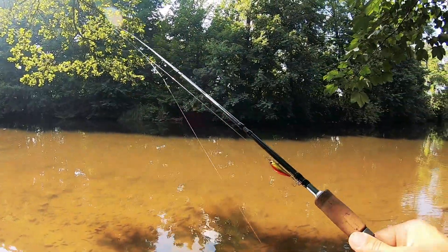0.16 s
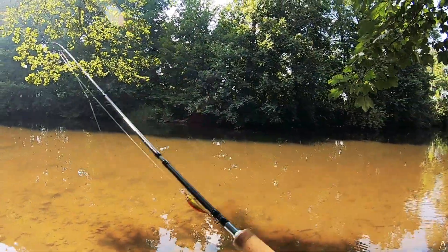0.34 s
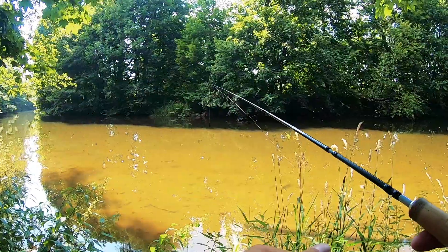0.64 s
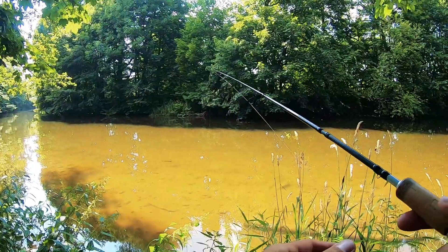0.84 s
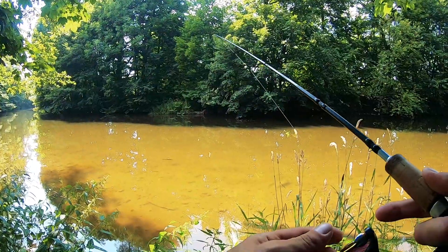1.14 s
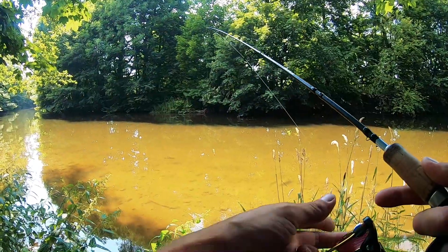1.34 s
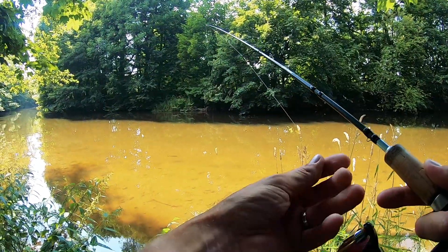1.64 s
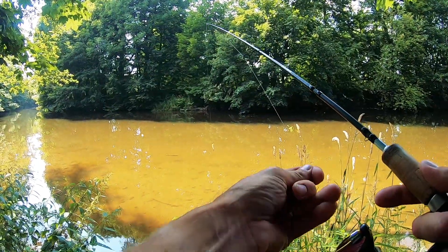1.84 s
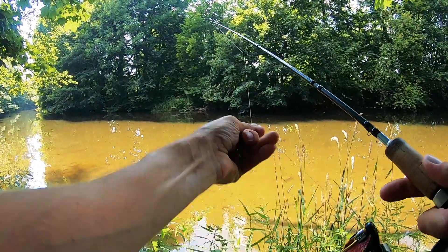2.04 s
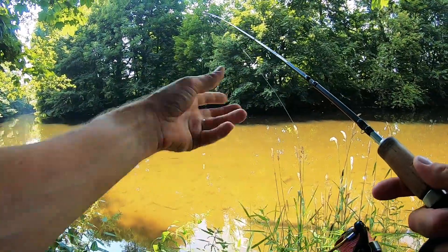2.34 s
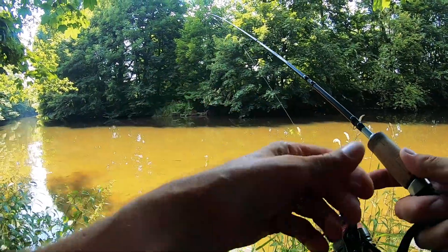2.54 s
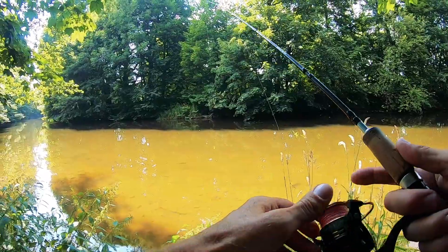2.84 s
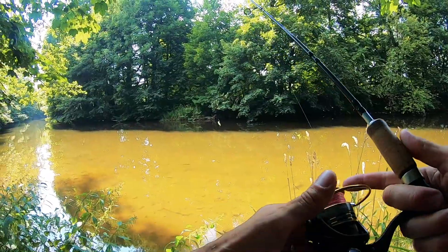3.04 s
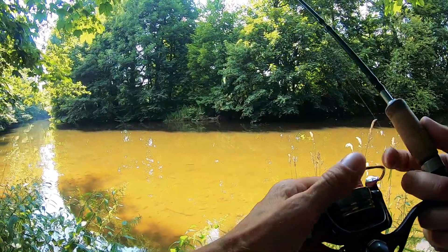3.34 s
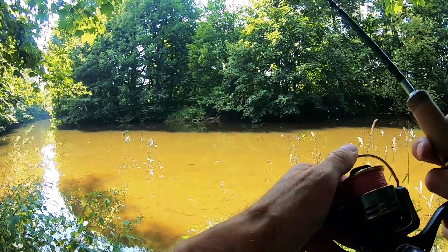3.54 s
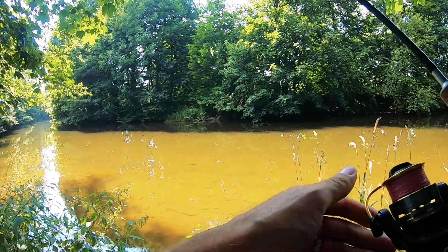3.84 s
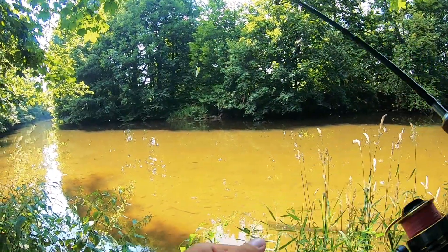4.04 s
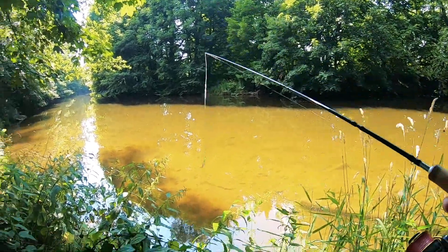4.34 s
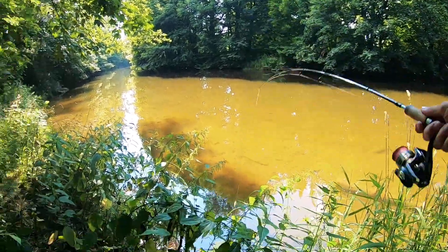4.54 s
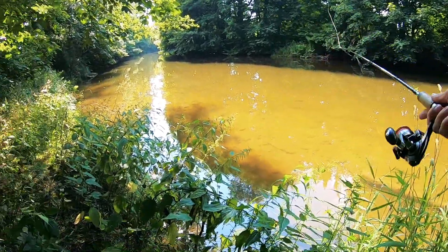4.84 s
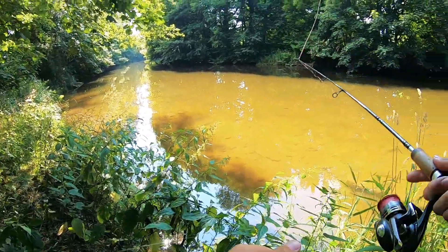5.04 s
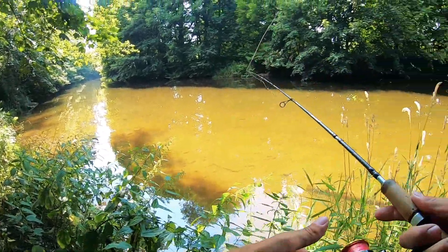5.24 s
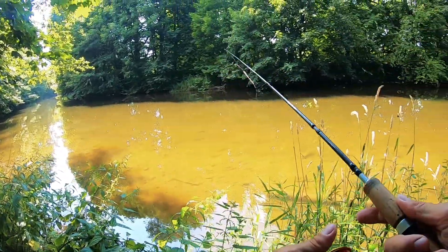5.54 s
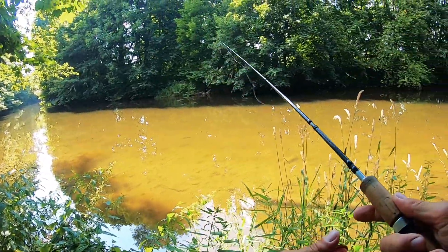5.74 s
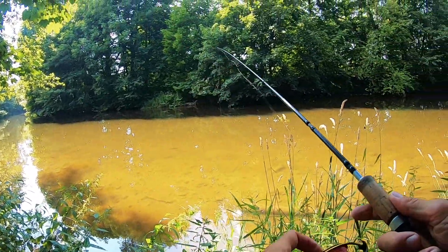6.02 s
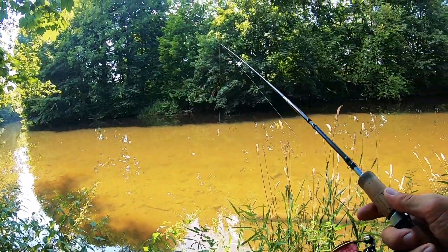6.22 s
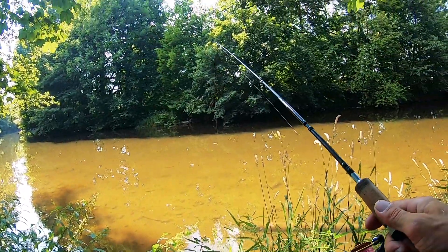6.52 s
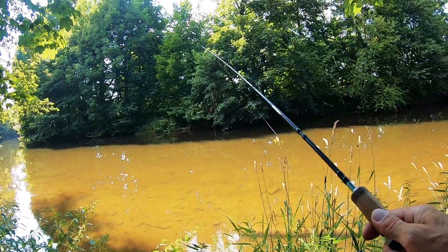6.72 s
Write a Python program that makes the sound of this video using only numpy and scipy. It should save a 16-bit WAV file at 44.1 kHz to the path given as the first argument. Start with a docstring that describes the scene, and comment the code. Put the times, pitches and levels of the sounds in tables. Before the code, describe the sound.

On a wooded riverbank with chirping birds, a reel's drag buzzes briefly, a rod casts with a knock, line hisses, and the reel snaps shut.

```python
"""A wooded river bank, where an angler casts: line is pulled off against the reel's clicking drag,
the bail is opened, the rod swings past, line hisses out and the bail snaps shut.
Drag and spool are clicks and rings; reel and rod are struck resonances; the swing's puff of air is a pressure dip.
Sleeve and line are rubbing noise. Small birds, as gliding whistles with echoes from the trees, call over
a soft rush, light air and a brief low drone of coloured noise."""
import sys
import numpy as np
from scipy import signal
from scipy.fft import rfft, irfft
from scipy.io import wavfile

SR = 44100
rng = np.random.default_rng(int(sys.argv[2]) if len(sys.argv) > 2 else 0)


def generate_wav(sig):
    """Save sig (samples, or channels by samples) to the path in sys.argv[1] as 16-bit PCM at SR."""
    pcm = np.round(np.clip(np.atleast_2d(sig).T, -1, 1) * 32767).astype(np.int16)
    wavfile.write(sys.argv[1], SR, pcm)


N = 303408
TIME = np.arange(N) / SR
RUSH_ONSET_S = .425   # the rush sets in loud here, after a hushed start
GRIP_S = 2.1   # from here on the hands keep rustling on rod and reel

# kinds of bird call, each one glide: length_s, first_hz, last_hz (both before the call's pitch ratio),
# bend (1 straight, more = quick at first), loudest (share of the length)
RISING = (.15, 2620, 3920, .9, .58)
FALLING = (0.15, 5350, 4600, 2.5, 0.31)
HELD = (.13, 5250, 4950, 1.6, .3)
THIN = (.08, 7600, 7150, 1.0, .35)
SLUR = (.09, 6300, 3200, 1, 0.48)


def from_db(db):
    """Decibels to gain."""
    return 10 ** (np.asarray(db) / 20)


def rms_one(x):
    """Scale to unit power."""
    return x / np.sqrt(np.mean(x ** 2) + 1e-20)


def add(out, s, sound):
    """Mix a sound in at time s."""
    at = max(int(s * SR), 0)
    out[:, at:at + sound.shape[-1]] += sound[..., :max(N - at, 0)]


def pan(left_db):
    """Gains of the two channels for a level difference, left minus right."""
    return from_db(np.array([[left_db], [-left_db]]) / 2)


def bump(s, width_s):
    """A bell-shaped rise and fall around time s."""
    return np.exp(-((TIME - s) / width_s) ** 2)


def swell(start_s, rise_s, hold_s, fade_db_per_s):
    """An envelope that rises to 1, holds and dies away."""
    t = TIME - start_s
    return np.clip(t / rise_s, 0, 1) * from_db(-fade_db_per_s * np.maximum(t - rise_s - hold_s, 0))


def drift(rate, t=TIME):
    """Random wander with a spread near 1: this many random points per second, joined by straight lines."""
    return np.interp(t * rate, np.arange(4000), rng.standard_normal(4000))


def port_noise(size, alike, lag_count=0):
    """White noise at two microphone ports: partly shared, reaching the left one some samples late."""
    shared, own = rng.standard_normal(size), rng.standard_normal((2, size))
    return np.sqrt(alike) * np.array([np.roll(shared, lag_count), shared]) + np.sqrt(1 - alike) * own


def coloured(white, colour):
    """Noise given a spectrum; rms 1."""
    hz, db = np.transpose(colour)
    log_hz = np.log(np.arange(N // 2 + 1) * SR / N + 1e-3)
    gain = from_db(np.interp(log_hz, np.log(hz), db, left=-90))
    return rms_one(irfft(rfft(white) * gain, N))


def resonate(x, modes):
    """Parallel resonances of unit peak gain before their levels, signs alternating."""
    out = 0
    for k, (hz, width_hz, db) in enumerate(modes):
        r = np.exp(-np.pi * width_hz / SR)
        zeros = np.array([1, 0, -1]) * (1 - r * r) / 2
        poles = [1, -2 * r * np.cos(2 * np.pi * hz / SR), r * r]
        out = out + (-1) ** k * from_db(db) * signal.lfilter(zeros, poles, x + 1e-18)
    return out


def scatter(x, t60, alike):
    """Diffuse echoes from ground, trunks and leaves, at unit energy."""
    t = TIME[:SR]
    tail = port_noise(SR, alike) * np.exp(-np.log(1000) * t / t60) * (1 - np.exp(-t / 0.0016))
    tail = tail / np.sqrt(np.sum(tail ** 2) / 2)
    return signal.fftconvolve(np.atleast_2d(x), tail, axes=1)[:, :N]


def burst(t, decay_s, alike):
    """A dying scrape of two hard parts, its energy spread evenly over all pitches."""
    spectrum = rfft(port_noise(len(t), alike, lag_count=3) * np.exp(-t / decay_s))
    even = irfft(spectrum / (np.abs(spectrum) + 1e-12), len(t))
    even = even * np.exp(-(t / decay_s / 4) ** 2)
    return even * np.sqrt(decay_s * SR / 2 / np.sum(even ** 2, axis=1, keepdims=True))


def rubbing(gain, colour, grain_db, left_db):
    """Sliding friction: a hiss made uneven by fibres that catch and slip."""
    hiss = coloured(port_noise(N, alike=0.054, lag_count=3), colour)
    return gain * hiss * from_db(grain_db * drift(300)) * pan(left_db)


def strikes(hits, body, rattle_s, rattle_db, rattle_db_per_doubling, knock_hz, tick_hz, alike, echo_db):
    """Blows on one body: heavy ones wake its low modes, light ones its high modes; a duller rattle goes along."""
    usual_contact_s = 0.0021   # a blow this long leaves rattle_db; longer scrapes leave more
    out, t = np.zeros((2, N)), TIME[:8192]
    dull = signal.butter(4, 10000, fs=SR, output="sos")
    for s, knock_db, tick_db, decay_s, left_db in hits:
        shaken_db = rattle_db + rattle_db_per_doubling * np.log2(decay_s / usual_contact_s)
        rattle = signal.sosfilt(dull, port_noise(len(t), alike=0.49)) * np.exp(-t / rattle_s)
        rattle = rattle * from_db(shaken_db + 2.9 * drift(217, t))
        modes = []
        for hz, width_hz, db, lean_db in body:
            # between knock and tick pitch the blow's level is a straight line over log pitch
            blow_db = np.interp(np.log(hz), np.log([knock_hz, tick_hz]), [knock_db, tick_db])
            # each mode radiates to the two ports in its own way
            sides_db = (left_db + lean_db) * np.array([[1], [-1]]) / 2
            modes.append((hz, width_hz, db + blow_db + sides_db))
        add(out, s, resonate(burst(t, decay_s, alike) + rattle, modes))
    return out + from_db(echo_db) * signal.sosfilt(dull, scatter(out, t60=0.59, alike=.2))


def outdoors(hush_db=-15, apart_hz=7000, waver_db=.5):
    """A far rush of water and leaves: hushed at first, then loud, settling and widening, with a dip after the cast."""
    # colour of the rush: pitch_hz, level_db
    rush_colour = [(53, -59), (90, -9), (108, -20), (141, -4.5), (159, 1), (280, -8), (396, -3.5),
                   (685, -4.5), (856, -2), (1050, -5), (2180, -26), (4900, -35), (5650, -41.5), (7360, -35),
                   (11500, -58), (15000, -88), (22000, -120)]
    # colour of the part that differs between the ports: pitch_hz, level_db
    spread_colour = [(59, -54), (100, -26), (136, -3), (162, 2.5), (298, -21), (754, -4), (1190, -5),
                     (1290, -6.5), (2500, -30.5), (3250, -59), (5500, -120)]
    rush_db, extra_db, settle_s = -52.5, 7, 2.02
    dip_s, dip_db, recover_s = 4.42, -5, 2.15
    spread_db, spread_start_s, spread_rise_s = -57, 0.79, 1.3
    settling_db = extra_db * np.clip(1 - (TIME - RUSH_ONSET_S) / settle_s, 0, 1)
    dipping_db = dip_db * (TIME > dip_s) * np.exp(-np.abs(TIME - dip_s) / recover_s)
    level_db = rush_db + settling_db + dipping_db + hush_db * (TIME < RUSH_ONSET_S)
    # long waves reach both ports alike, short ones differ
    high_pass = signal.butter(1, apart_hz, "high", fs=SR, output="sos")
    apart = signal.sosfilt(high_pass, rng.standard_normal(N))
    rush = coloured(rng.standard_normal(N) + apart * [[1], [-1]], rush_colour)
    rush = rush * from_db(level_db + waver_db * drift(7.5))
    widening = from_db(spread_db) * np.clip((TIME - spread_start_s) / spread_rise_s, 0, 1)
    spread = widening * coloured(rng.standard_normal(N), spread_colour)
    return rush + spread * [[1], [-1]]


def breeze(hush_db=-8, lumpy_db=4):
    """Light air buffets the ports as low, lumpy noise, with a few gusts."""
    # colour of the buffeting: pitch_hz, level_db
    buffet_colour = [(15, -11), (35, 10), (55, 11), (85, -4), (110, -16), (150, -45)]
    # gusts: centre_s, level_db
    gust_rows = [(.47, -56), (1.93, -60), (2.2, -61), (3.08, -61), (3.74, -56), (4.39, -42), (5.65, -56)]
    steady_db, gust_half_width_s = -66.5, .06
    steady = from_db(steady_db + hush_db * (TIME < RUSH_ONSET_S))
    gusts = sum(from_db(db) * bump(s, gust_half_width_s) for s, db in gust_rows)
    buffeting = coloured(port_noise(N, alike=0.58), buffet_colour)
    return buffeting * np.hypot(steady, gusts) * from_db(lumpy_db * drift(5.5))


def far_drone():
    """A far low drone, the same at both ports: narrow noise that comes in with the rush and fades away."""
    # colour of the drone: pitch_hz, level_db
    drone_colour = [(90, -34), (130, -5), (170, 13), (230, 0), (400, -42), (2000, -79.5)]
    envelope = swell(RUSH_ONSET_S, rise_s=0.082, hold_s=0.36, fade_db_per_s=27)
    return from_db(-54) * envelope * coloured(port_noise(N, alike=1.0), drone_colour)


def birds(waver=0.012, flutter_db=4.0, wood_db=-3.0, taper=1.6):
    """Wavering whistles that swell and fade along a glide, smeared by the trees; the farthest arrive mostly as echo."""
    # calls: start_s, kind, level_db, pitch ratio, direct_db (direct sound's gain beside the echoes)
    bird_calls = [(.425, HELD, -56.5, 0.98, -17), (.69, RISING, -60, .98, -28),
                  (1.165, THIN, -70, .995, -2), (1.32, THIN, -66, 0.93, -15),
                  (1.476, RISING, -52, 0.98, -4.5), (1.68, THIN, -69, 1.03, -7),
                  (3.014, RISING, -53.5, 1.02, 1), (3.24, THIN, -63.5, 0.98, -10),
                  (3.255, SLUR, -64, 0.97, -2), (3.39, THIN, -62.5, 1.02, -10),
                  (3.845, FALLING, -57.5, .99, -1.5), (4.98, FALLING, -59.5, 1.01, -1.5),
                  (5.665, RISING, -54, 0.99, -5), (5.881, THIN, -59, 0.95, -21),
                  (6.015, HELD, -57.5, .94, -8)]
    glide_share = .76   # the glide takes this share of a call; then the pitch is held
    calls, direct = np.zeros((2, 2, N))
    for s, (length_s, first_hz, last_hz, bend, loudest), db, ratio, direct_db in bird_calls:
        t = TIME[:int(length_s * SR)]
        to_go = np.maximum(1 - t / (glide_share * length_s), 0)
        hz = last_hz + (first_hz - last_hz) * to_go ** bend
        arch = np.sin(np.interp(t / length_s, [0, loudest, 1], [0, np.pi / 2, 0])) ** taper
        phase = 2 * np.pi * np.cumsum(hz * ratio * (1 + waver * drift(501, t))) / SR
        call = np.sqrt(2) * arch * from_db(db + flutter_db * drift(121, t)) * np.sin(phase)
        add(calls, s, call)
        add(direct, s, from_db(direct_db) * call)
    return direct + from_db(wood_db) * scatter(calls, t60=0.64, alike=0.7)


def sleeve_rub():
    """Cloth friction: single arm movements rub the sleeve over the steady rustle of the grip."""
    # arm movements: start_s, rise_s, hold_s, level_db
    arm_moves = [(-.02, 0.034, 0.069, -53.5), (0.215, 0.074, 0.041, -55.5), (0.373, 0.027, 0.016, -54.5),
                 (1.79, 0.27, 0.2, -53.5), (2.987, 0.027, 0.018, -61), (3.87, 0.19, 0.45, -51.5),
                 (4.671, 0.047, .05, -57), (6.08, 0.064, 0.047, -50), (6.735, 0.026, 0.018, -62.5)]
    # colour of the rubbing: pitch_hz, level_db
    cloth_colour = [(200, 10), (600, 4), (1400, 3.5), (2500, -4), (4000, -5.5), (6000, -7), (8500, -10),
                    (11000, -27), (15000, -79)]
    fade_db_per_s, grip_db = 90, -62
    moves = [from_db(db) * swell(s, rise_s, hold_s, fade_db_per_s) for s, rise_s, hold_s, db in arm_moves]
    grip = from_db(grip_db) * (TIME > GRIP_S)
    strength = np.sqrt(np.sum(np.square(moves), axis=0) + grip ** 2)
    return rubbing(strength, cloth_colour, grain_db=2.0, left_db=-2.0)


def line_hiss():
    """Line rubs as it runs out through the rod rings, then slows with the lure."""
    # colour of the hiss: pitch_hz, level_db
    hiss_colour = [(2000, -47), (5000, -3.5), (8500, 2.5), (10300, -10), (12000, -23), (15000, -28)]
    running = from_db(-60.5) * swell(4.836, rise_s=0.12, hold_s=0.16, fade_db_per_s=51)
    return rubbing(running, hiss_colour, grain_db=3.5, left_db=-3.5)


def air_puff(port_hz=22, port_q=0.78):
    """The swing drags air past the ports: brief suction, which rebounds in the microphone's bass cut."""
    # puffs of air: centre_s, suction_db, half_width_s
    puff_rows = [(4.3690, -4, .008), (4.370, -9, .002), (4.400, -13, .007)]
    suction = -sum(from_db(db) * bump(s, width_s) for s, db, width_s in puff_rows)
    w = 2 * np.pi * port_hz
    bass_cut = signal.bilinear([1, 0, 0], [1, w / port_q, w * w], SR)
    return signal.lfilter(*bass_cut, suction) * pan(-9.7)


def rod_strikes():
    """Line and tackle strike the rod during the cast and wake the modes of its blank and rings."""
    # blows: start_s, knock_db (low), tick_db (high), decay_s, left_minus_right_db
    rod_hits = [(4.3238, -21, -28, 0.002, -2), (4.3977, -7, -16, 0.00043, -12.5),
                (4.658, -34, -59, 0.0032, 4), (4.7175, -30, -31, 0.00086, -10),
                (4.843, -37, -39.5, 0.0009, -1), (4.8677, -22, -25, 0.00063, -5.5),
                (4.973, -36, -37, 0.0011, -9), (5.044, -37.5, -44, .0025, -6)]
    # rod blank and rings: pitch_hz, width_hz, level_db, left_minus_right_db
    rod_modes = [(566, 240, 0.5, 13), (1290, 200, -4, -16.5), (1740, 400, -4, -12.5), (2240, 550, 0, -6),
                 (3230, 1200, 2, 4), (4250, 720, 6, 11.5), (5900, 1270, 5, 6), (7050, 1000, 7, 9),
                 (8100, 680, 6, -1), (10700, 890, -7.5, -2)]
    return strikes(rod_hits, rod_modes, rattle_s=0.024, rattle_db=-15, rattle_db_per_doubling=4.5,
                   knock_hz=1850, tick_hz=4360, alike=0.46, echo_db=-40)


def finger_ticks(spread_db=6, left_db=-2):
    """Faint touches at random moments once the hands are on the reel, as rows of blows for strikes()."""
    ticks_per_s, knock_db, tick_db, decay_s = 2.8, -43.5, -48, 0.0018
    left_over_s = N / SR - GRIP_S
    rows = []
    for when, size in rng.random((int(ticks_per_s * left_over_s), 2)):
        change_db = spread_db * (size - .5)
        rows.append((GRIP_S + when * left_over_s, knock_db + change_db, tick_db + change_db, decay_s, left_db))
    return rows


def reel_strikes():
    """Bail, rotor and fingers knock on the reel and wake the modes of its frame and the rod butt."""
    # blows: start_s, knock_db (low), tick_db (high), decay_s, left_minus_right_db
    clack_rows = [(0.044, -47, -48, .004, -9), (1.1, -42.5, -48, .0026, -2),
                  (2.748, -43, -52.5, 0.0055, -4), (3.068, -35, -46, 0.003, 0),
                  (3.509, -35.5, -43, 0.0012, -1), (3.653, -40, -42, .001, -5),
                  (3.759, -37, -38, 0.0026, -3), (3.7846, -15.5, -7.5, .00075, -4.5),
                  (6.009, -30.5, -34.5, 0.0027, -2), (6.131, -36, -14, 0.00084, -7),
                  (6.138, -24.5, -27, 0.0062, -3), (6.1512, -5.5, -10, 0.0021, -6),
                  (6.168, -14, -23, 0.0015, -6), (6.173, -22, -23, 0.0018, 0),
                  (6.2528, -24.5, -36.5, .0021, 2), (6.4957, -35, -48, 0.0038, 0),
                  (6.5756, -33, -47.5, 0.0021, -3), (6.7914, -23, -31, .002, 1)]
    # reel frame and rod butt: pitch_hz, width_hz, level_db, left_minus_right_db
    reel_modes = [(265, 170, 0.5, 4), (554, 450, -5.5, -0.5), (1190, 140, -2, -10.5), (1628, 85, 0, -12.5),
                  (2080, 250, 4, -0.5), (2586, 110, 5.5, 0), (2950, 340, 4, -3.5), (4370, 530, 2, -5.5),
                  (5120, 730, 2.5, 2.5), (6880, 700, 4.5, 1.5), (7850, 260, 8.5, 0), (8380, 880, 1.5, -1),
                  (10570, 420, -13.5, -2), (13140, 1600, -63, -1)]
    return strikes(clack_rows + finger_ticks(), reel_modes, rattle_s=0.015, rattle_db=-19.5,
                   rattle_db_per_doubling=8.5, knock_hz=2230, tick_hz=6000, alike=0.55, echo_db=-25.0)


def pull():
    """The hand's pull on the line: each surge loads the pawl, so it is louder and shifts the spring's pitch."""
    # speed of the line pulled against the drag: time_s, clicks_per_s
    pull_speed = [(1.983, 30.6), (2.01, 47.7), (2.06, 110), (2.12, 173), (2.17, 250), (2.28, 304),
                  (2.342, 71)]
    # surges: centre_s, extra_db, half_width_s, pitch_rise_hz
    surge_rows = [(2.104, 6, 0.059, -100), (2.228, 6, 0.024, 900), (2.297, 4, 0.014, 1400)]
    tooth_db = -18.5   # one tooth under light load
    slow_hz, fast_hz, knee_per_s = 8360, 6470, 86   # the spring pings lower once the teeth come fast
    s, clicks_per_s = np.transpose(pull_speed)
    rate = np.interp(TIME, s, clicks_per_s)
    turning = (TIME >= s[0]) & (TIME <= s[-1])
    level_db = tooth_db + sum(db * bump(s, width_s) for s, db, width_s, _ in surge_rows)
    spring_hz = fast_hz + (slow_hz - fast_hz) * np.exp(-(rate / knee_per_s) ** 2)
    spring_hz = spring_hz + sum(hz * bump(s, width_s) for s, _, width_s, hz in surge_rows)
    return turning, rate, level_db, spring_hz


def spool_ring(energy, turning, late_s):
    """The metal spool rings on: each mode stores the energy of the pawl's taps and lets it die away."""
    # spool modes: pitch_hz, level_db, t60_s
    spool_modes = [(5233, -36, .42), (7639, -41.5, .39), (7849, -39, .52)]
    # the taps come out of step with the modes: their energies add up and they jolt the phase
    jolts = np.cumsum(turning * rng.standard_normal(N)) * .04
    ring = 0
    for hz, db, t60 in spool_modes:
        keep = np.exp(-2 * np.log(1000) / (t60 * SR))
        amplitude = np.sqrt(signal.lfilter([1], [1, -keep], energy))
        ring = ring + from_db(db) * amplitude * np.sin(2 * np.pi * hz * (TIME - late_s) + jolts)
    # while it turns, the taps now feed and now damp the ring
    return ring * from_db(turning * (3 * drift(90) - 3))


def drag(contact_s=0.0016, spring_db=-8, spring_spread=.02, echo_db=-13, left_db=-4, uneven_db=.8,
         shared=1.09, own=0.47):
    """The pawl drops into one tooth after another as the spool turns; its spring pings and the spool rings on."""
    # the drag pawl and its housing: pitch_hz, width_hz, level_db
    pawl_modes = [(2510, 260, -2.5), (3240, 130, -2.5), (3800, 930, -9.5), (5310, 180, -1.5),
                  (6000, 650, 1), (6830, 900, -1.5), (7700, 330, 0.5), (8250, 750, 1), (10600, 210, -14),
                  (13400, 1100, -28)]
    turning, rate, level_db, spring_hz = pull()
    teeth = np.flatnonzero(np.diff(np.ceil(np.cumsum(rate * turning) / SR)))
    t = TIME[:256]
    attack = t / .0007 * np.exp(1 - t / .0007)
    late_s = np.array([[2.5], [0]]) / SR   # the left port hears 2.5 samples late
    chatters = [burst(t, contact_s, alike=0.54) for _ in range(32)]
    force, pings, energy = np.zeros((3, 2, N))
    for k, at in enumerate(teeth):
        s = TIME[at] + rng.normal(0, .00012)
        strength = from_db(level_db[at] + uneven_db * rng.standard_normal())
        # neighbouring teeth chatter alike, each with a part of its own; the blend moves on every 7.7 teeth or so
        sector, turn = divmod(k / 7.92, 0.97)
        here, following = chatters[int(sector)], chatters[int(sector) + 1]
        usual = np.cos(turn * np.pi / 2) * here + np.sin(turn * np.pi / 2) * following
        add(force, s, strength * attack * (shared * usual + own * burst(t, contact_s, alike=0.55)))
        ping_hz = spring_hz[at] * rng.normal(1, spring_spread)
        add(pings, s, strength * attack * np.sin(2 * np.pi * ping_hz * (t - late_s)))
        add(energy, s, strength ** 2 * np.ones(1))
    pawl = resonate(force, pawl_modes) + from_db(spring_db) * pings
    echoes = from_db(echo_db) * scatter(pawl, t60=0.11, alike=0.14)
    return (pawl + echoes + spool_ring(energy, turning, late_s)) * pan(left_db)


def scene():
    """Tackle close by, mostly on the right, birds and rush beyond."""
    bank = outdoors() + breeze() + far_drone() + birds()
    cast = sleeve_rub() + line_hiss() + air_puff() + rod_strikes()
    return bank + cast + reel_strikes() + drag()


def record(dry):
    """The top is cut steeply above 16.1 kHz."""
    return signal.sosfilt(signal.ellip(10, .1, 80, 16100, fs=SR, output="sos"), dry)


dry = scene()
out = record(dry)
generate_wav(out)
```